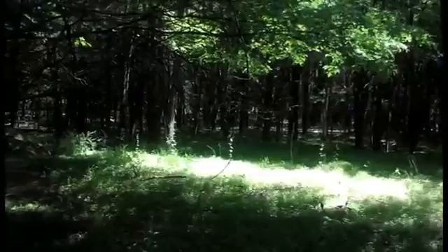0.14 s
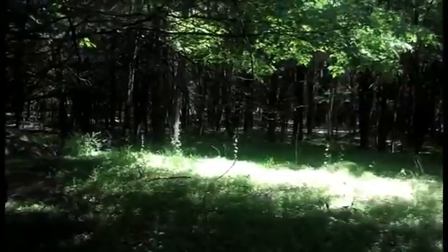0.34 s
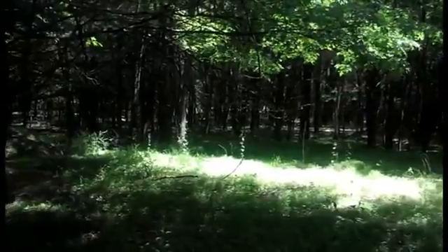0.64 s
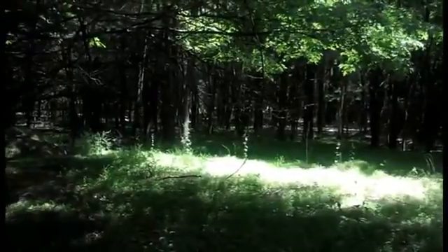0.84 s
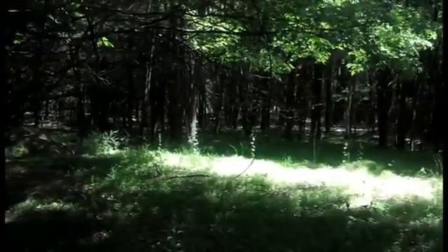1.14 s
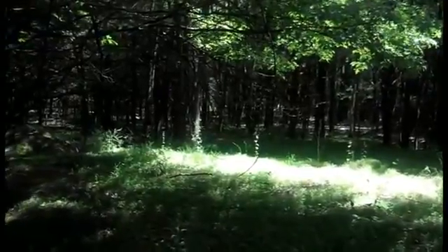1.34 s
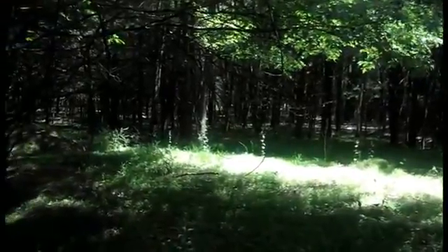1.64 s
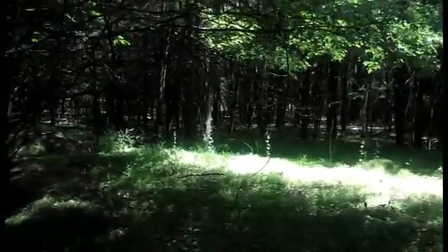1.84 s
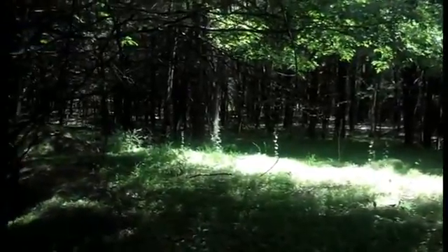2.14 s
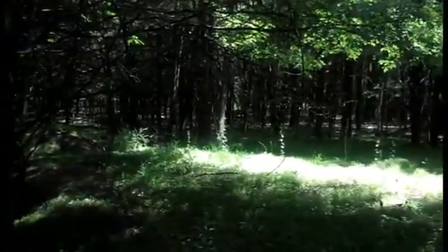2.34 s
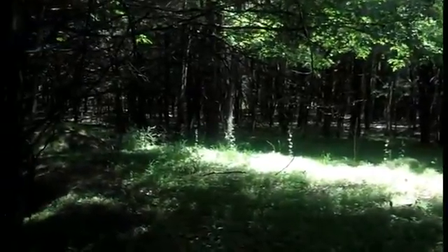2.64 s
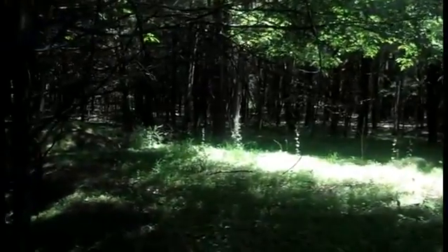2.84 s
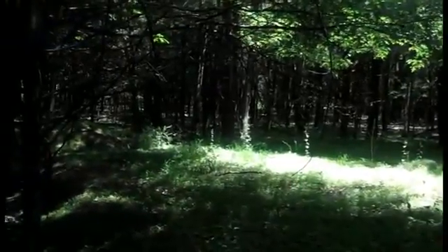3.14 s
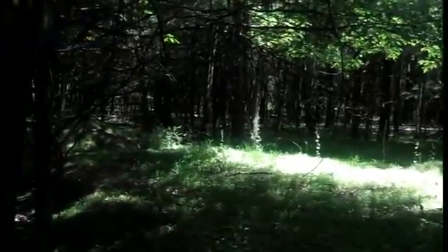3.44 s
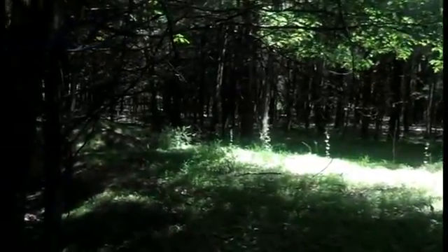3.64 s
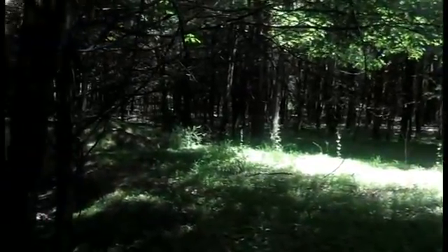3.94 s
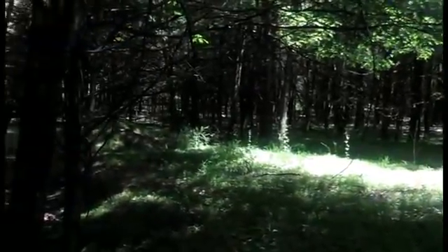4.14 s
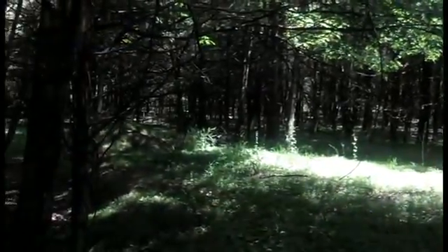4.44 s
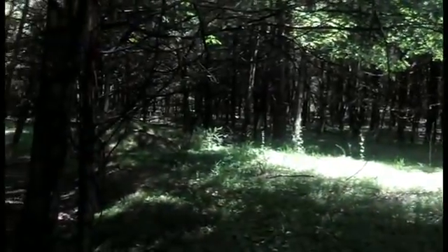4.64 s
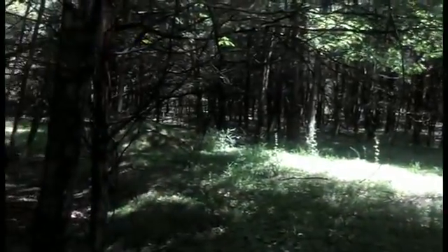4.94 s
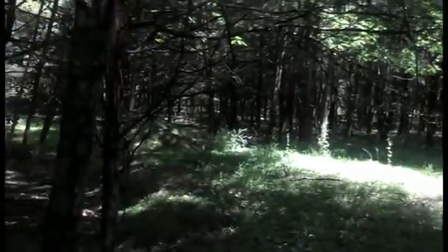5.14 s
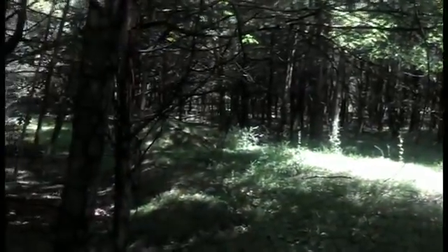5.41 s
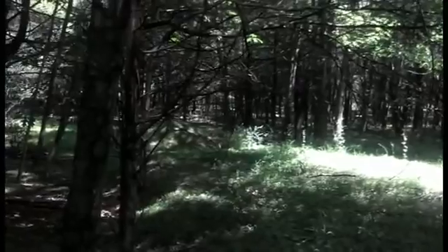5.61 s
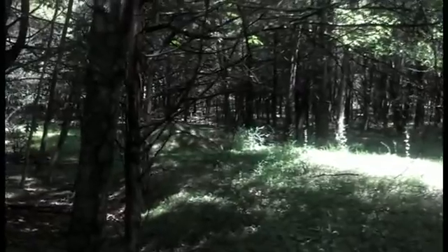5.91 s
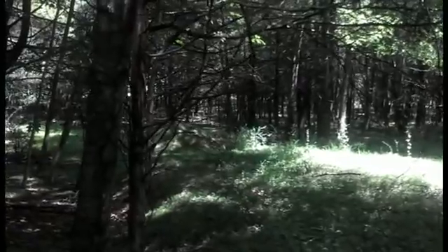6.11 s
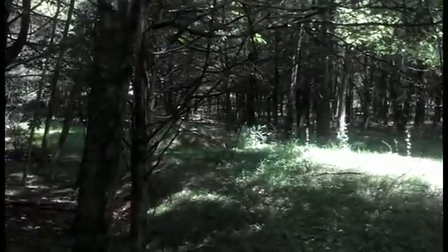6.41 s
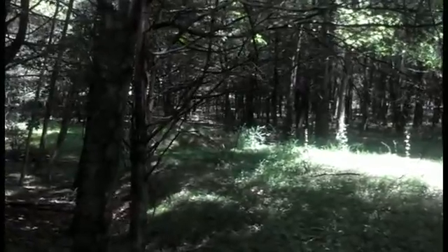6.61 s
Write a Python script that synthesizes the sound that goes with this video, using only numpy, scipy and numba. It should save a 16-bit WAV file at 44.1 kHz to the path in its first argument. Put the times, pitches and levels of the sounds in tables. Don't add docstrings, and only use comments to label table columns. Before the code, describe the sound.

A continuous, blended cicada chorus fills the forest from every side, a smooth whirring tone with no single insect standing out. Quiet sizzling highs and faint low rumble lie around it. Tiny muffled bumps from a hand holding the device come irregularly, a little stronger past halfway; near the end a heavy low thump hits very close, followed shortly by a sharper, clickier knock, each briefly pressing the chorus down.

```python
import sys
import numpy as np
from scipy import signal
from scipy.fft import rfft, irfft, next_fast_len
from scipy.io import wavfile
from scipy.ndimage import uniform_filter1d, minimum_filter1d
from numba import njit

SR = 44100
rng = np.random.default_rng(int(sys.argv[2]) if len(sys.argv) > 2 else 0)


def wav_out(sig):
    wavfile.write(sys.argv[1], SR, np.round(np.clip(np.atleast_2d(sig).T, -1, 1) * 32767).astype(np.int16))


def ratio_of_db(decibels):
    return 10 ** (np.asarray(decibels, float) / 20)


N = 298557
TOP_HZ = 15000


# time in seconds, drone level in dB.
CHORUS_SWELL = [(0.0, -27), (0.3, -25.5), (0.65, -28.5), (1.3, -26.5), (1.9, -27), (2.2, -28),
                (2.75, -25.5), (3.1, -27.5), (3.45, -25.5), (3.7, -27.5), (3.95, -26), (4.6, -27.5),
                (4.9, -28), (5.5, -26.5), (6.0, -27), (6.3, -28.5), (6.5, -26), (6.77, -28)]
# frequency in Hz, density in dB per Hz.
DRONE_COLOUR = [(950, -41.5), (1120, -17.5), (1250, -6.5), (1340, 1.5), (1390, -2.5), (1430, -7),
                (1600, -20.5), (1800, -43)]


def low_drone():
    drone = groups(DRONE_COLOUR, lambda: clicks(9000, 1.06), count=14,
                   swell_db=0.38, swell_rate=1.62, flicker_db=0.45, flicker_rate=6.3)
    seconds, swell_db = np.transpose(CHORUS_SWELL)
    return drone * ratio_of_db(np.interp(np.arange(N) / SR, seconds, swell_db))


# frequency in Hz, density in dB per Hz.
STRAGGLER_COLOUR = [(700, -23.5), (780, -11), (850, 0), (1000, 0), (1150, 4), (1600, 0.5), (1760, -4.5),
                    (2150, -11.5), (2700, -14), (3200, -27)]


def stragglers():
    spread = groups(STRAGGLER_COLOUR, lambda: clicks(12000, 1.2), count=8,
                    swell_db=0.5, swell_rate=1.9, flicker_db=1.15, flicker_rate=5.9)
    return spread * ratio_of_db(-41.5)


# frequency in Hz, density in dB per Hz.
BUZZ_COLOUR = [(2500, -14), (3100, -7.5), (3800, 0.5), (4400, -3.5), (5500, 0.5), (6100, -1.5), (6700, -11),
               (7300, -24), (8500, -33)]


def high_buzz():
    buzz = groups(BUZZ_COLOUR, lambda: clicks(22000, 1.2), count=6,
                  swell_db=-0.8, swell_rate=1.2, flicker_db=0.34, flicker_rate=12)
    start_db, rise_db_per_s = -54.1, 0.18
    return buzz * ratio_of_db(start_db + rise_db_per_s * np.arange(N) / SR)


def clicks(per_second, scatter_db):
    chance = rng.random((3, N))
    happens = chance[0] < per_second / SR
    size = ratio_of_db(-scatter_db * np.log(chance[1] + 1e-9))
    sign = np.sign(chance[2] - 0.5)
    return level(happens * size * sign, 0)


def groups(colour, source, count, swell_db, swell_rate, flicker_db, flicker_rate):
    size = next_fast_len(N)
    hz, density_db = np.transpose(np.array(colour, float))
    octave = np.log2(np.maximum(np.arange(size // 2 + 1) * SR / size, 1))
    gain = ratio_of_db(np.interp(octave, np.log2(hz), density_db, left=-200, right=-200))
    place = (octave - np.log2(hz[0])) / np.log2(hz[-1] / hz[0]) * (count - 1)
    out = np.zeros(N)
    for k in range(count):
        share = np.cos(np.pi / 2 * np.clip(place - k, -1, 1))
        wander_db = swell_db * walk(swell_rate) + flicker_db * walk(flicker_rate)
        group = irfft(rfft(source(), size) * gain * share, size)[:N]
        out += group * ratio_of_db(wander_db)
    return level(out, 0)


def walk(rate):
    hold = int(SR / rate)
    held = rng.standard_normal(400)[np.arange(N) // hold % 400]
    return uniform_filter1d(uniform_filter1d(held, hold), hold) * 4 / 3


def level(x, db):
    return x * ratio_of_db(db) / np.sqrt(np.mean(x ** 2))


# start in seconds, peak level in dB, first pitch in Hz, last pitch in Hz, 60 dB decay in seconds.
KNOCKS = [
    (4.4486, -38.5, 540, 500, 0.02),
    (6.1342, -1.5, 410, 123, 0.026),
    (6.1347, -17, 510, 496, 0.025),
    (6.138, -20, 131, 122, .055),
    (6.7462, -5, 830, 270, 0.006),
    (6.7458, -19, 520, 495, 0.034),
    (6.7468, -23.5, 149, 200, 0.04),
    (6.74625, -20, 2700, 2300, 0.003),
    (6.7466, -33, 4700, 4100, 0.003),
    (6.7463, -41, 7500, 6500, .003),
]
# start in seconds, peak level in dB, first pitch in Hz, 60 dB decay in seconds.
THUDS = [(.498, -34.5, 170, .089), (.809, -35, 210, .092), (1.325, -37.5, 190, .063),
         (1.458, -37, 210, .088), (1.6026, -31, 200, .063), (1.686, -40, 210, .081),
         (2.205, -34.5, 220, .08), (2.33, -36, 200, .07), (2.433, -39.5, 240, .092),
         (2.624, -38.5, 190, .1), (3.386, -33, 224, .043), (3.475, -39, 220, .052), (4.011, -35, 210, .071),
         (4.393, -36.5, 240, .06), (4.4492, -23, 215, .064), (4.4901, -28.5, 258, .047),
         (4.5256, -27, 210, .095), (4.882, -33.5, 200, .064), (5.6665, -25.5, 235, .07),
         (5.8003, -29.5, 300, .11), (5.905, -34, 220, .08), (6.087, -33, 210, .08)]


def handling():
    case_hz = 105
    thuds = [(s, db, first_hz, case_hz, t60) for s, db, first_hz, t60 in THUDS]
    out = np.zeros(N + SR)
    for s, db, first_hz, last_hz, t60 in thuds + KNOCKS:
        at = int(s * SR)
        out[at:at + SR // 4] += ratio_of_db(db) * blow(first_hz, last_hz, t60)
    fidget = signal.fftconvolve(clicks(30, 1.4), blow(200, 95, 0.07))[:N]
    case = signal.butter(3, 42, "high", fs=SR, output="sos")
    return signal.sosfilt(case, out[:N] + level(fidget, -54))


def blow(first_hz, last_hz, t60):
    t = np.arange(SR // 4) / SR
    turns = first_hz * t
    hz = last_hz + (first_hz - last_hz) * np.exp(-turns / 1.36)
    rise = 1 - np.exp(-(turns / 0.76) ** 2)
    decay = np.exp(-np.log(1000) * t / t60)
    wave = rise * decay * np.sin(2 * np.pi * np.cumsum(hz) / SR)
    return wave / np.abs(wave).max()


# frequency in Hz, density in dB per Hz.
RUMBLE_COLOUR = [(8, -37.5), (28, -29.5), (42, -17), (60, -4.5), (130, -0.5), (200, -6.5), (270, -11),
                 (450, -14.5), (700, -22), (1200, -30.5)]


def far_rumble():
    rumble = groups(RUMBLE_COLOUR, lambda: clicks(900, 1.6), count=8,
                    swell_db=1.16, swell_rate=2.5, flicker_db=0.8, flicker_rate=14)
    return rumble * ratio_of_db(-47.2)


# frequency in Hz, density in dB per Hz.
HISS_COLOUR = [(500, -7), (3000, -2.5), (7500, 0), (8200, 1), (10500, -2), (14000, 0), (TOP_HZ, -2)]


def microphone_hiss():
    hiss = groups(HISS_COLOUR, lambda: rng.standard_normal(N), count=4,
                  swell_db=0.2, swell_rate=1.1, flicker_db=0.3, flicker_rate=11)
    return level(hiss, -65.5)


def scene():
    cicadas = low_drone() + stragglers() + high_buzz()
    return (cicadas + handling() + far_rumble() + microphone_hiss())[None]


@njit
def follow(x, top, release):
    e, out = top, np.empty(len(x))
    for i in range(len(x)):
        e = max(abs(x[i]), top + (e - top) * release)
        out[i] = e
    return out


def limiter(dry):
    top, ratio = float(ratio_of_db(-9)), 1.2
    hold_s, release_s = 0.22, 0.04
    hold = int(hold_s * SR) // 2 * 2 + 1
    held = -minimum_filter1d(-np.abs(dry[0]), hold, origin=hold // 2)
    peak = follow(held, top, float(np.exp(-1 / (release_s * SR))))
    return dry * uniform_filter1d((top / peak) ** (1 - 1 / ratio), size=200, origin=99)


def top_cut(x):
    return signal.sosfilt(signal.butter(12, 15690, fs=SR, output="sos"), x)


def record(dry):
    low_pass = signal.ellip(8, 0.2, 70, TOP_HZ, fs=SR, output="sos")
    mix = signal.sosfilt(low_pass, limiter(dry)) + 0.0003
    return top_cut(mix)


dry = scene()
out = record(dry)
wav_out(out)
```